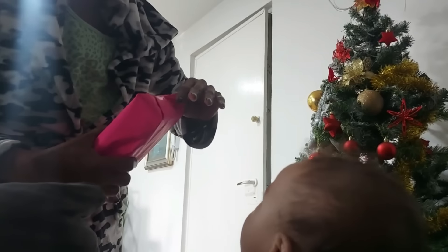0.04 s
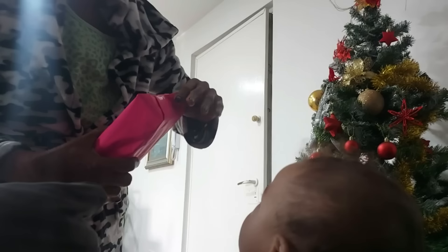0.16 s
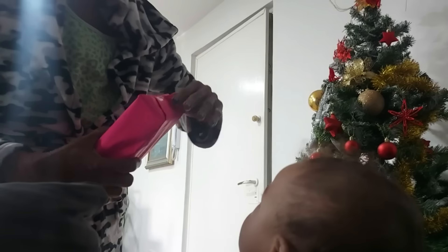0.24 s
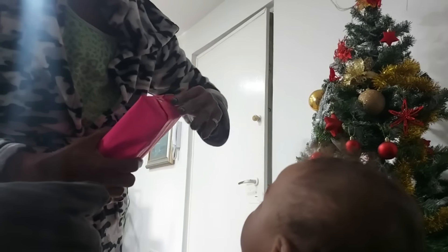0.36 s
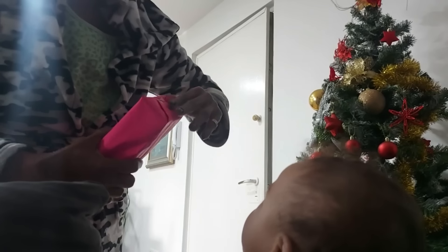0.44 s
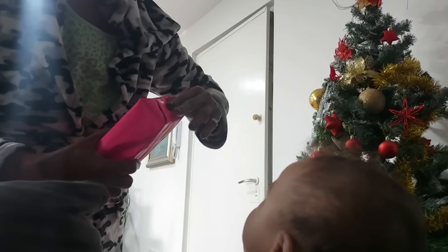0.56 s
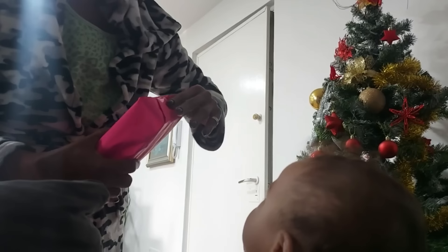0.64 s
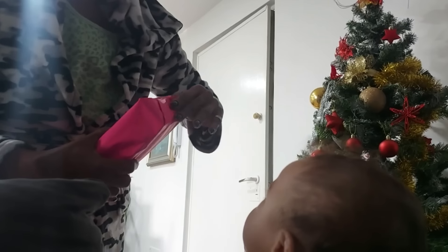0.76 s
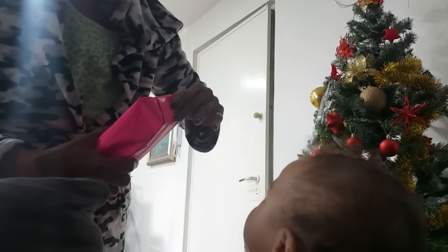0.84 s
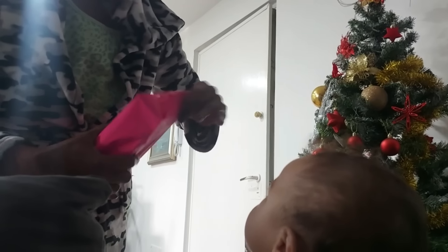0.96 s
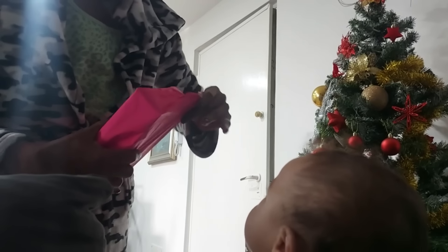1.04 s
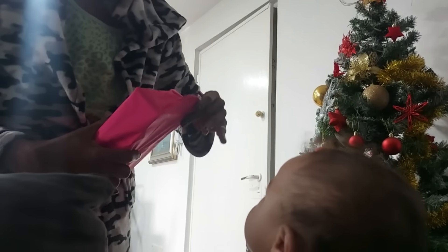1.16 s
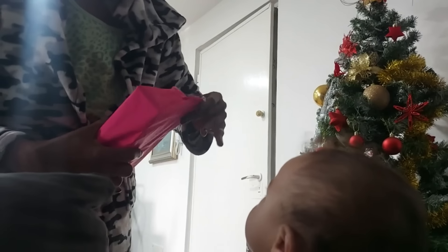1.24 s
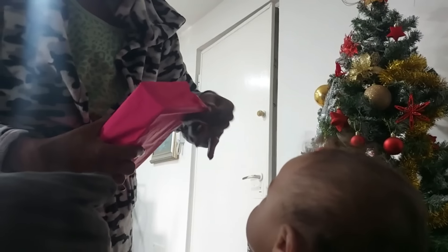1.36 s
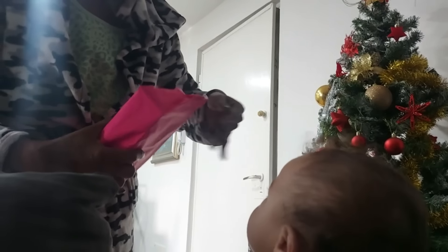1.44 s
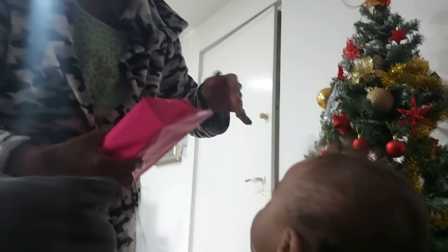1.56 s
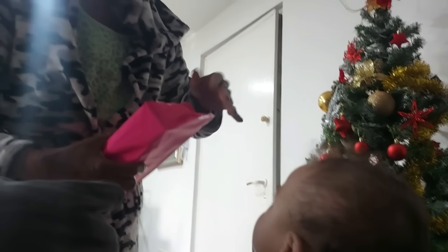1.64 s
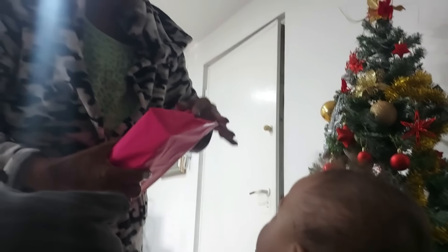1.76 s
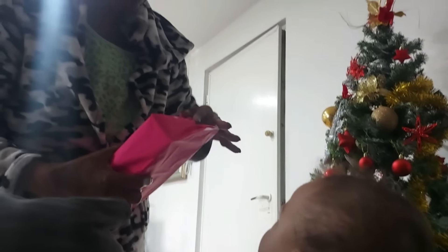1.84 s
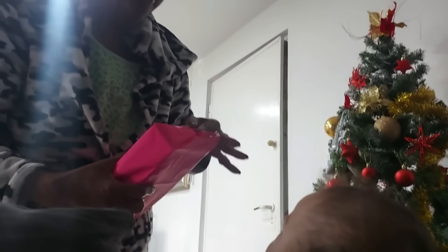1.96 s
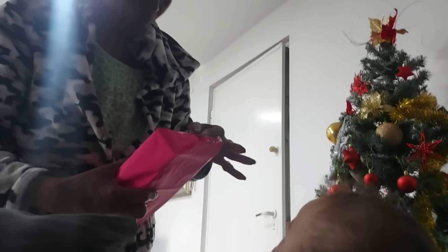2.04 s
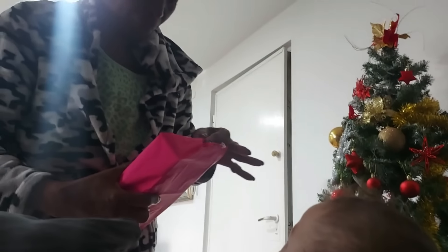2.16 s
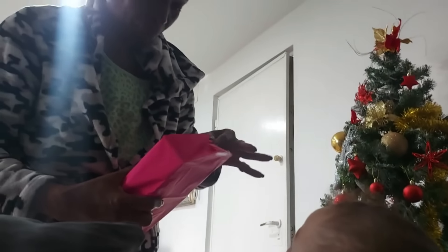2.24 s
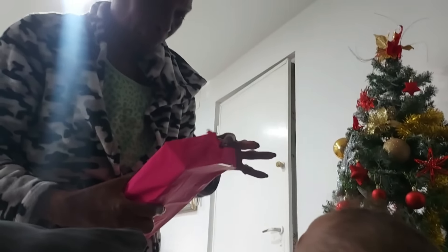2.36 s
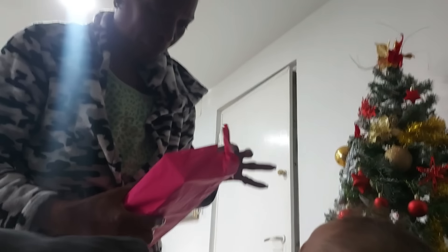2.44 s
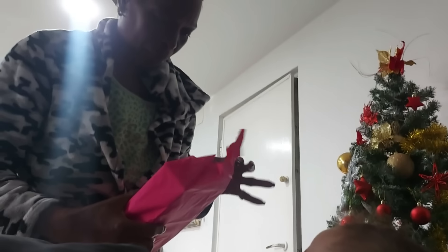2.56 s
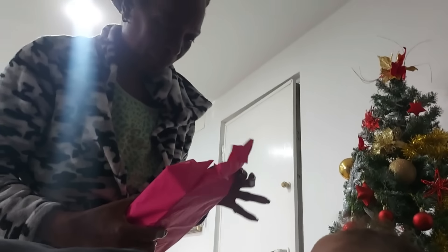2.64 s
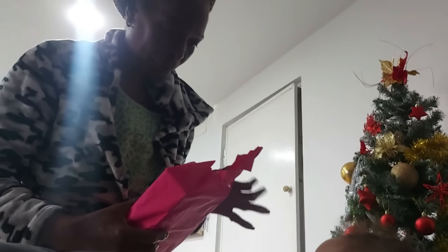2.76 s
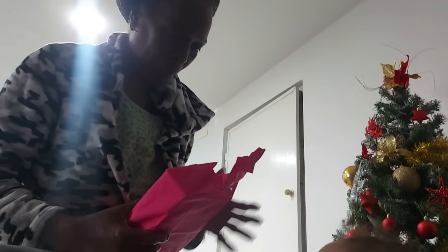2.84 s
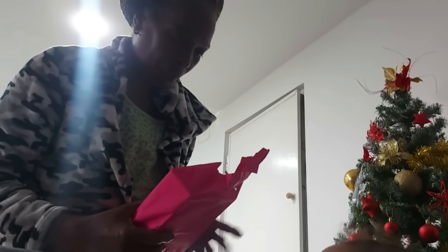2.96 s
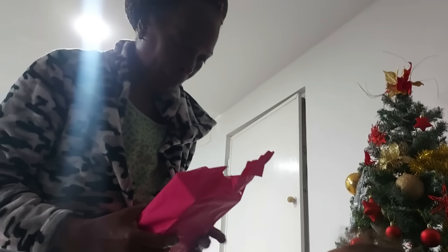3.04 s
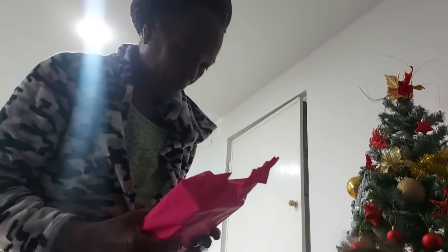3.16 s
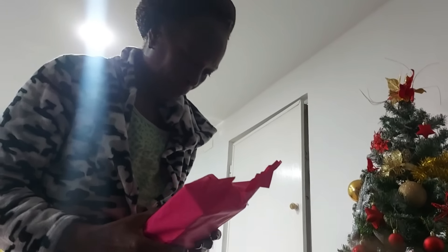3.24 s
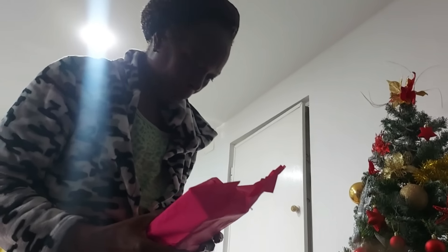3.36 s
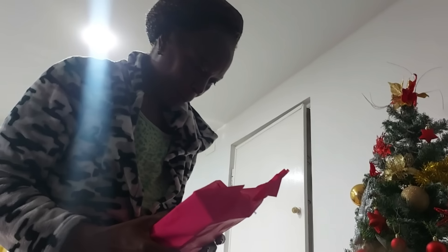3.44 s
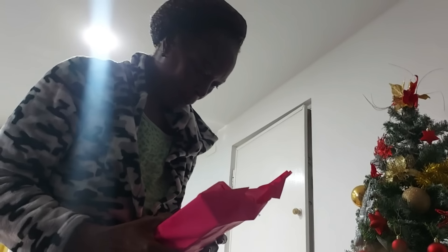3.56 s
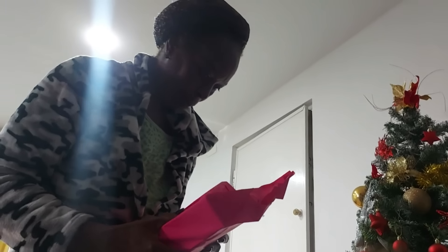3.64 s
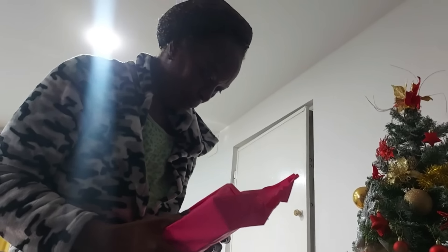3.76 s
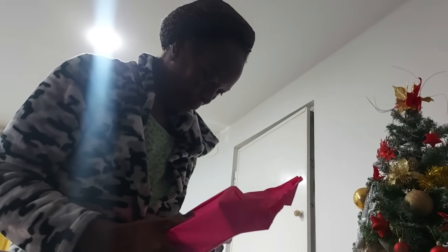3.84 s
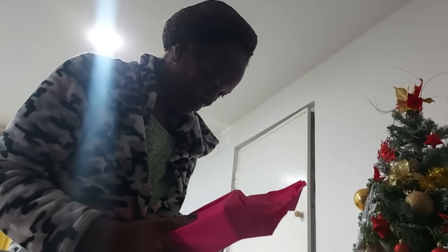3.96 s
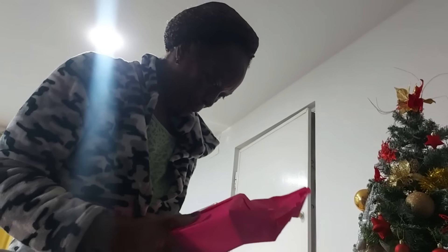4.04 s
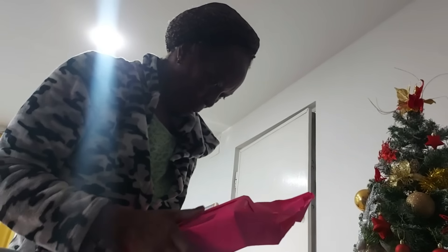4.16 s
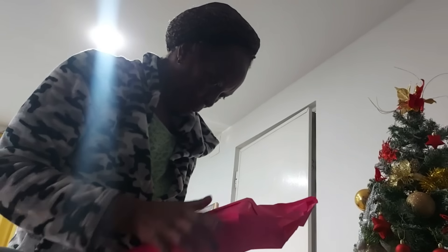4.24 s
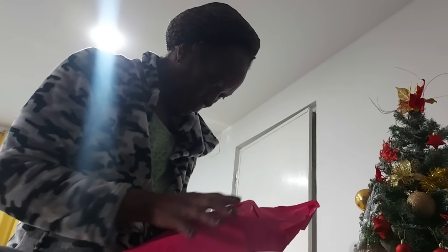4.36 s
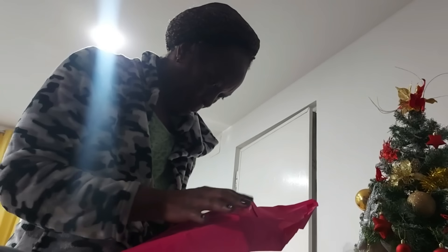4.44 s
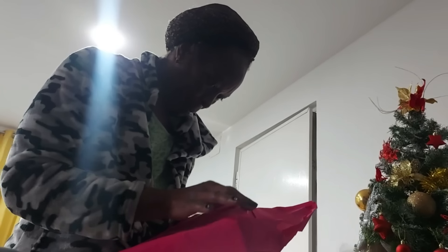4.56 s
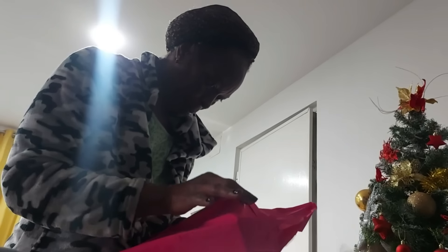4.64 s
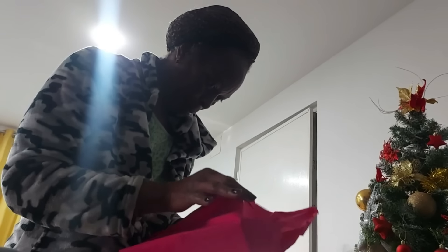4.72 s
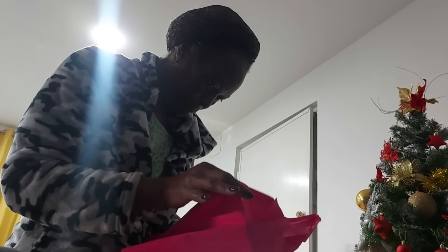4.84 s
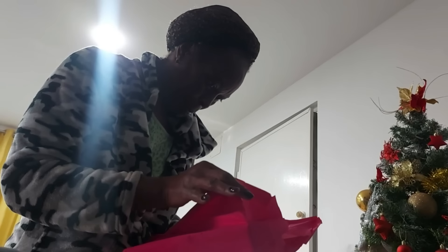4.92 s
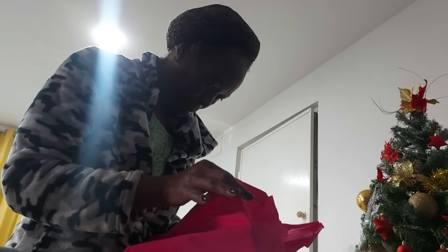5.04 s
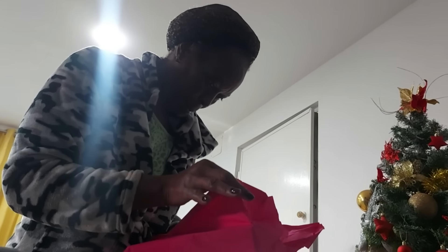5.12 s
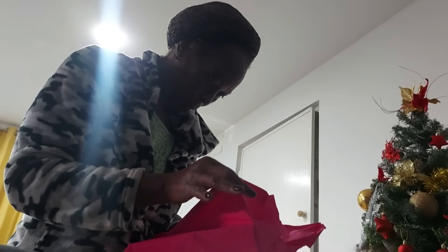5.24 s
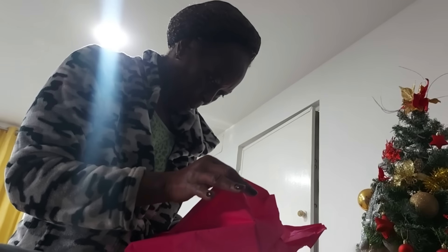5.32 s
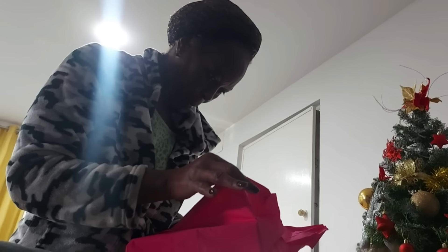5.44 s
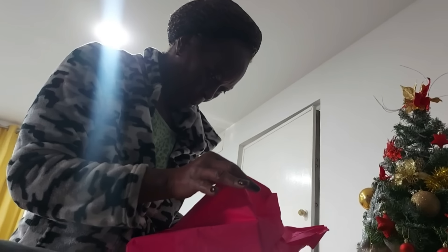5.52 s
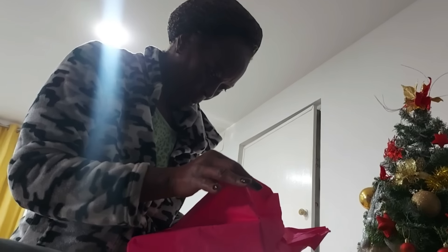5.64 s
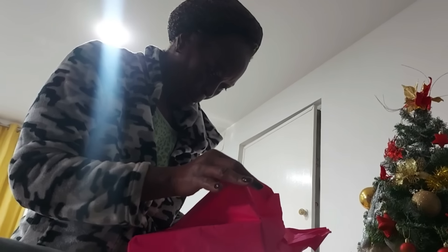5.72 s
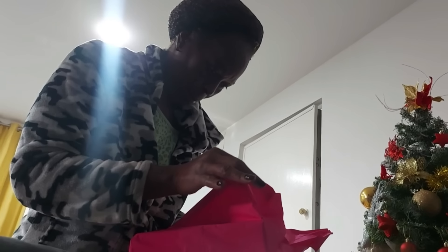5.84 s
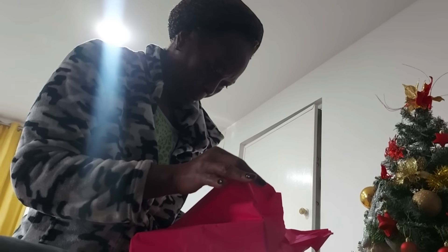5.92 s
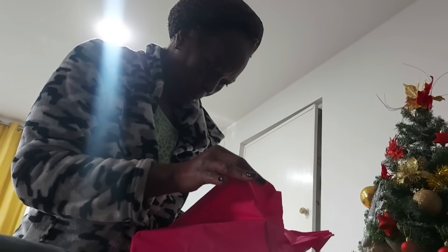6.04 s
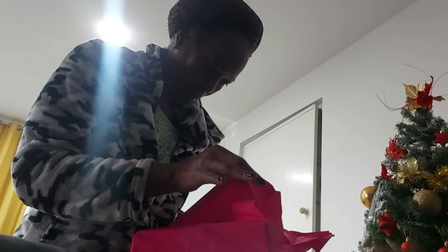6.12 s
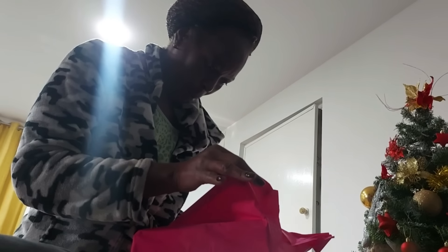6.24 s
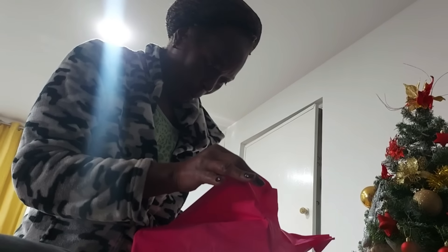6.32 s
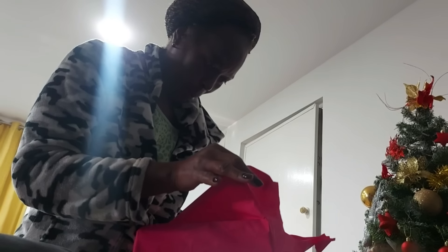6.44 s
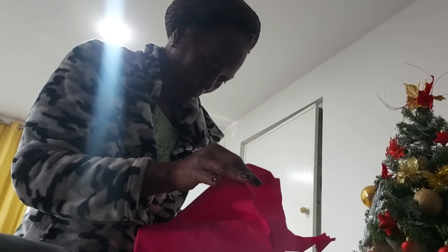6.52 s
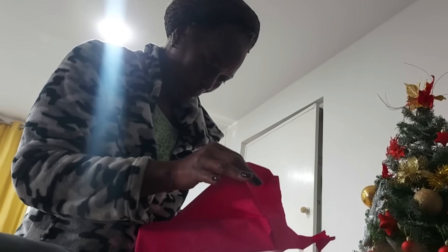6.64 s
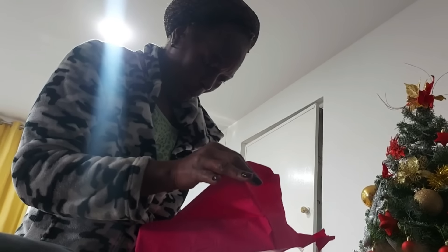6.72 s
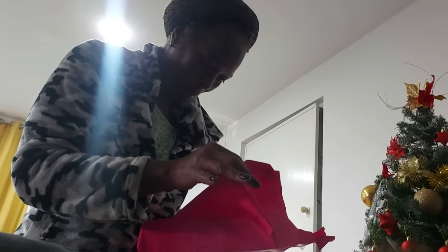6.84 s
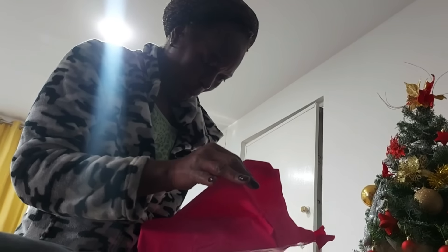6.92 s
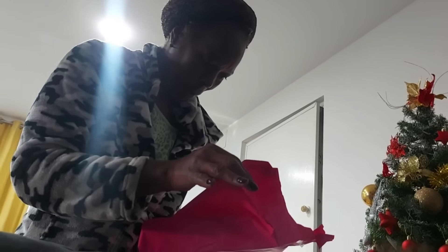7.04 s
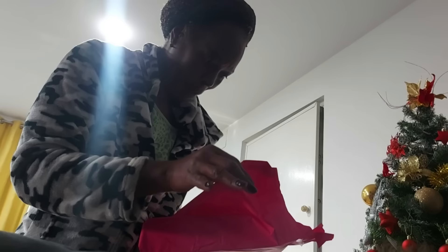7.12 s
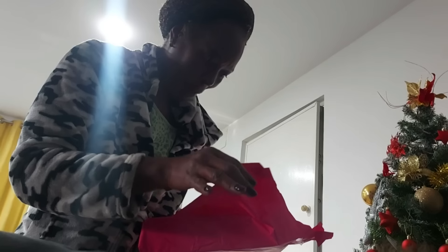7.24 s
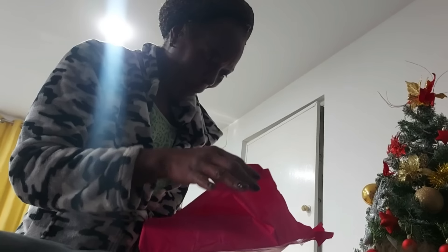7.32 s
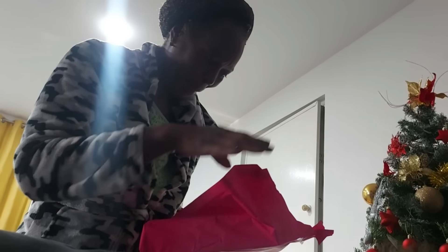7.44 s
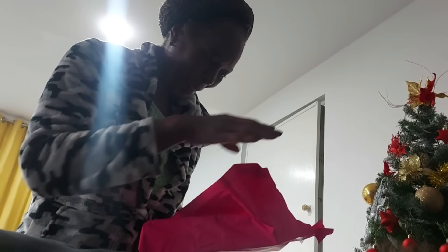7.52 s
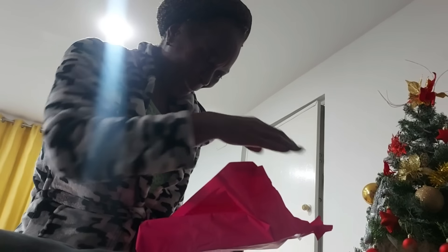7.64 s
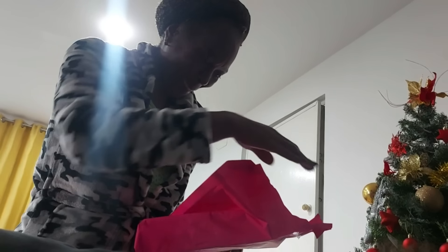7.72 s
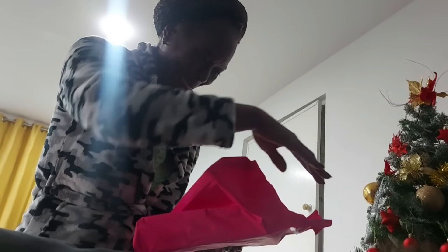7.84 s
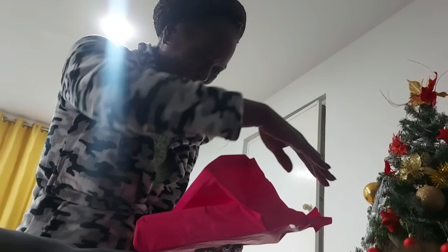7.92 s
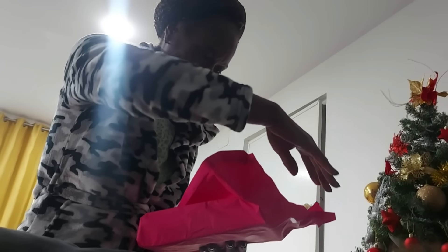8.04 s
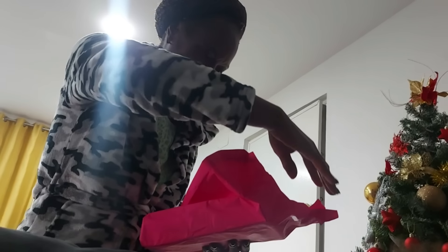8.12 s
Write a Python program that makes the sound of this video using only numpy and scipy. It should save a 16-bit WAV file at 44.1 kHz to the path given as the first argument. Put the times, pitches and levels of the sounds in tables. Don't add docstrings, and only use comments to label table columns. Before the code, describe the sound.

Stiff wrapping paper is pulled off a box by hand, about a metre from a stereo microphone in a quiet, bare room with a short bright tail and faint hiss. From 0 to 1.6 s come crisp, uneven snaps and crinkles, with the sharpest crack at about 1.0 s. A near lull follows until 2.1 s. Then crackling swells into the fullest tearing burst at 2.4-2.8 s, with low box thumps. From 3.1 to 4.0 s looser, medium crinkles scatter and thin out. At 4.6-4.8 s a short dry hand rub and rustle are heard, then sparse faint ticks until 6.2 s. Duller, larger-sheet creases cluster at 6.2-6.6 s and again near 6.9 s, with soft knocks to 7.0 s. Light rubs pass around 7.3 s, and a padded bump at 7.9 s ends it almost quiet.

```python
import sys
import numpy as np
from scipy import signal
from scipy.io import wavfile
from scipy.ndimage import uniform_filter1d

SR = 44100
rng = np.random.default_rng(int(sys.argv[2]) if len(sys.argv) > 2 else 0)


def level_to_linear(level):
    exponent = np.asarray(level, float) / 20
    return 10 ** exponent


def dump(signal):
    limited = np.clip(np.atleast_2d(signal).T, -1, 1)
    pcm = np.round(limited * 32767).astype(np.int16)
    wavfile.write(sys.argv[1], SR, pcm)


N = 360826

# pitch_hz, density_db per Hz
FLOOR_SPECTRUM = [(25, -29.5), (50, -11), (108, -8), (200, -23.5), (350, -14), (600, -27), (1500, -24),
                  (4000, -33), (8000, -26), (12500, -23.5), (16000, -30.5)]
# pitch_hz, likeness_0_to_1
PORT_LIKENESS = [(60, 1), (300, 1), (640, 0.79), (1400, 0.021), (15000, .01)]
# pitch_hz, t60_s
ROOM_T60 = [(200, 0.21), (800, .45), (2500, 0.31), (6000, 0.32), (14000, 0.67)]
# pitch_hz, level_db
ROOM_COLOUR = [(300, 7), (800, 10), (2500, 10), (6000, 8), (12000, 3), (16000, -16)]
# pitch_hz, width_hz, level_db
PORT_RESONANCES = [(500, 152.4, -2.5), (802, 85, 5.5), (2500, 880, 2), (2700, 100, 2), (4290, 300, 2),
                   (9460, 1000, -5.5), (11090, 2700, 4.5)]
# pitch_hz, width_hz, level_db
ROOM_MODES = [(53.4, 25, -6), (109, 26, -0.5), (157, 36, -3), (301, 113, 0.5), (405, 92, -4.5)]
# time_s, peak_db, falloff_db per octave around 150 Hz
KNOCKS = [
    (1.013, -32, -3),
    (2.677, -28.5, 4),
    (6.505, -35.5, 0),
    (6.89, -30, 1),
    (7.025, -29, 5),
    (7.866, -43, 5),
    (7.893, -38, -0.5),
    (7.909, -30.5, 6),
    (7.916, -28.5, 3.5),
    (8.002, -45, 2.5),
]
# peak_s, rise_s per 20 dB, fall_s per 20 dB, thump_db
SHOVES = [(.339, 1, 1, -58.5), (.526, .13, .08, -59), (.808, 0.2, .19, -47.5), (1.037, -0.36, 0.5, -44.5),
          (1.46, 0.4, 0.04, -46), (2.432, 0.2, 0.5, -35.5), (2.691, 0.2, 0.07, -30), (3.2, .5, -2, -50),
          (3.6, 1.7, 0.63, -47), (4.648, 0.1, 0.5, -55), (4.8, 0.27, 0.6, -49.5), (5.1, .6, .5, -54.5),
          (6.03, -1.23, 0, -56.5), (6.225, 0.2, -2.5, -61), (6.311, -1.5, .8, -55),
          (6.497, 0.1, -0.04, -41), (6.79, -0.7, 0, -48), (7.051, 0.3, 0.11, -46), (7.336, -1.5, .5, -60.5),
          (7.93, 0.24, 0.3, -50)]
# peak_s, rise_s per 20 dB, fall_s per 20 dB, crackle_db
PULLS = [(0, .01, -0.07, -35), (.35, .1, 0.0644, -33.5), (.526, -0.44, 0.48, -46.5), (.661, 0, .5, -41),
         (.808, 0.3, -0.24, -43.5), (1.09, 0.1, 0.38, -36.5), (1.484, 2.2, 0.16, -48),
         (1.819, 0.2, 0.68, -60), (2.148, 0.57, .5, -54.5), (2.285, -0.087, 0.28, -36.5),
         (2.432, 0.2929, 0.29, -30.5), (2.691, 0.07, 0.1, -25.5), (2.82, .1, 0.4, -54),
         (3.163, 0.04, 1.5, -51), (3.62, 0.62, 0.2, -44), (3.761, 0.18, 0.4847, -40.5),
         (4.234, .5, 0.1, -57), (4.648, 0.06, 0.26, -43), (4.787, 0.15, 0.23, -41), (5.05, 1, 0.35, -54.5),
         (5.806, 0, 0.33, -59), (6.051, -0.04, 0.3, -62.5), (6.225, 0.04, 0.14, -52.5),
         (6.311, 0.07, 1.12, -50), (6.497, 0.1165, 0.03, -41), (6.775, 0.16, 0.39, -51.5),
         (6.904, 0.08, 0.1338, -36.5), (7.05, 0, 0.82, -58.5), (7.336, 0.1, 0.32, -56.5),
         (8.18, -0.14, 0.2, -64)]
# time_s, away_db (turned into the room), bright_db (taut sheet)
SHEET_FACING = [(0, -9, 4.5), (.5, -6.5, -6.5), (.75, -7.5, 5.5), (1.05, -9.5, -3), (1.45, -6.5, -4),
                (2.2, -8.5, -1.5), (2.65, -7.5, 5), (2.9, -8.5, -11), (3.2, -3.5, -4), (3.7, -10, -6.5),
                (4.301, -6.5, 1.5), (4.75, -9, 2), (5.1, -7.5, -12), (5.8, -11, 2), (6.2, -13.5, -6.5),
                (6.65, -16, -3), (6.95, -12.5, -9.5), (7.3, -6.5, 6), (7.699, -8, 12.5)]
# start_s, end_s, level_db, lowest_pitch_hz
SLIDES = [
    (1.447, 1.487, -43, 1500),
    (4.57, 4.634, -48, 3530),
    (4.643, 4.795, -41.5, 3020),
    (7.218, 7.255, -57.5, 3800),
    (7.314, 7.364, -50.5, 3520),
    (8.04, 8.091, -62.5, 3490),
]
# time_s, peak_db, ring_hz, edge_db over 8 kHz
FLAP_SNAPS = [(.0027, -18, 5150, -15), (0.049, -14.5, 4580, -33), (.2177, -30.5, 4340, -15.5),
              (0.2483, -20, 4800, -5), (0.266, -25.5, 7200, -2.5), (0.308, -24.5, 4480, -1),
              (0.3189, -16, 4200, -7.5), (.507, -30.5, 4700, 9), (.5933, -36.5, 7330, 1),
              (0.6517, -20, 8200, 3), (0.698, -28.5, 7630, -12.5), (0.73, -25, 4540, 0),
              (0.7357, -23.5, 3900, 3.5), (.745, -22.5, 7110, -9), (0.7895, -12, 5250, -5),
              (.8051, -25.5, 7100, -8), (0.8991, -28, 6800, 6), (0.9874, -39.5, 2690, -2),
              (1.0143, 0, 3600, -3), (1.145, -28.5, 7320, -10), (1.2621, -25, 4000, 2),
              (1.3104, -29, 6400, 7.5), (1.3401, -23.5, 3000, -3), (1.3505, -18, 5870, -10),
              (1.3745, -34, 7620, 8), (1.4382, -19.5, 5150, -7.5), (1.469, -29.5, 3170, 2),
              (1.4956, -33, 3180, 3.5), (1.588, -34.5, 4300, -30)]
# time_s, peak_db, ring_hz, edge_db
TEAR_SNAPS = [(1.803, -43, 2450, 6.5), (2.047, -38, 5000, -10), (2.1382, -26, 4930, 3),
              (2.1976, -24, 3350, -9), (2.2078, -27.5, 2707, 7), (2.2404, -22.5, 3250, -12.5),
              (2.3109, -19, 3520, -10.5), (2.352, -18, 2123, -14), (2.4179, -13, 3320, -23.5),
              (2.426, -2, 2660, -17), (2.448, -21, 2670, -2), (2.4637, -5.5, 5600, -14.5),
              (2.4732, -16.5, 2500, -2.5), (2.5216, -16.5, 2700, -11), (2.5428, -22.5, 2120, -12),
              (2.6176, -14.5, 4340, -15), (2.6507, -10.5, 7150, -14), (2.6586, -15, 2280, 1),
              (2.6784, -11, 3000, -2), (2.6851, -15.5, 4000, 0), (2.7805, -14.5, 4000, -24),
              (2.7964, -18.5, 4220, -1), (2.833, -22, 2580, -10)]
# time_s, peak_db, ring_hz, edge_db
TURN_SNAPS = [(3.0793, -28.5, 7500, 3.5), (3.149, -30, 4330, -17), (3.162, -26.5, 7100, -0.5),
              (3.2421, -26, 5600, -17), (3.254, -30, 7700, 2), (3.2689, -21, 4280, -8.5),
              (3.3912, -20.5, 4800, -6), (3.4906, -19, 3100, -15), (3.5372, -19.5, 4660, -7.5),
              (3.5994, -19.5, 4550, -11), (3.622, -17, 5300, -1), (3.6608, -26.5, 1950, -14),
              (3.7275, -26.5, 4600, 5), (3.749, -17.5, 6230, -15), (3.7631, -21, 4530, 5),
              (3.84, -32, 5300, -15), (3.9044, -26.5, 6900, -12), (3.989, -34, 4330, -21),
              (4.036, -32.5, 4700, -4), (4.213, -33.5, 4730, -5), (4.2365, -30.5, 5630, -27),
              (4.2554, -37, 7440, -9.5), (4.3748, -35, 7360, -19), (4.4487, -40, 6770, -2)]
# time_s, peak_db, ring_hz, edge_db
SEAM_SNAPS = [(4.6402, -23, 6600, -5), (4.6505, -30, 7700, -17), (4.7568, -32, 4330, -6),
              (4.7667, -26.5, 4100, -16), (4.7819, -24.5, 7300, 1.5), (4.7948, -17.5, 2590, -9),
              (4.9529, -29, 1800, -13), (5.059, -42.5, 5070, 0), (5.1447, -35, 4190, -17),
              (5.199, -39.5, 3500, -9.5), (5.765, -43.5, 2800, -13.5), (5.7936, -28, 4080, -18),
              (6.04, -44.5, 4100, -6.5)]
# time_s, peak_db, ring_hz, edge_db
OPEN_SHEET_SNAPS = [(6.2218, -33, 7240, -3), (6.2873, -33.5, 4400, -21), (6.2998, -18, 4260, -8),
                    (6.3362, -31, 4160, -18), (6.4364, -31.5, 2880, -21), (6.477, -19, 3520, -35),
                    (6.488, -18.5, 3730, -11), (6.4979, -20.5, 2700, -30), (6.545, -26, 3370, -14),
                    (6.5619, -24.5, 3970, -14), (6.603, -16, 4120, -14), (6.7071, -39, 3750, -13),
                    (6.7375, -34, 1490, -18.5), (6.7538, -33.5, 2180, -15), (6.786, -32.5, 3680, -13),
                    (6.7982, -32, 4100, -14), (6.817, -32.5, 2800, -13), (6.8453, -38, 2890, -18),
                    (6.868, -18.5, 2530, -28), (6.89, -19, 4080, -20), (6.896, -17.5, 4500, -4),
                    (6.9119, -28, 4000, -22), (7.0293, -24.5, 1470, -16), (7.055, -26.5, 4560, -18),
                    (7.099, -34, 3570, -13), (7.167, -40.5, 2570, -12), (7.3886, -41, 3430, -23),
                    (7.658, -46.5, 2560, -8.5)]

BURST = 400


def at_hz(points, hz):
    table = np.array(points)
    return np.interp(np.log(hz), np.log(table[:, 0]), table[:, 1])


def rms_one(x):
    return x / np.sqrt(np.mean(x ** 2) + 1e-20)


def energy_one(x):
    return x / np.sqrt(np.sum(x ** 2) / 2)


def band(x, low_hz, high_hz):
    edges_hz = [low_hz, min(high_hz, .45 * SR)]
    return signal.sosfilt(signal.butter(2, edges_hz, "band", fs=SR, output="sos"), x)


def resonance(x, hz, width_hz):
    r = np.exp(-np.pi * width_hz / SR)
    poles = [1, -2 * r * np.cos(2 * np.pi * hz / SR), r * r]
    return signal.lfilter([(1 - r * r) / 2, 0, (r * r - 1) / 2], poles, x)


def drift(rate):
    r = np.exp(-80 * np.pi * rate / SR)
    slow = signal.lfilter([1], [1, -2 * r, r * r], rng.standard_normal(N // 40 + 2002))
    slow = rms_one(slow[2000:])
    return np.interp(np.arange(N) / 40, np.arange(len(slow)), slow)


def two_ports(white, hz):
    alike = np.clip(at_hz(PORT_LIKENESS, hz), 0, 1)
    return np.sqrt(alike) * white[0] + np.sqrt(1 - alike) * white[1:]


def efforts(rows, rest_db):
    peak_s, rise_s, fall_s, db = np.transpose(rows)[..., None]
    t = np.arange(0, N + 64, 64) / SR
    since = t - peak_s
    level_db = db - 20 * np.maximum(-since / np.abs(rise_s), since / np.abs(fall_s))
    strongest_db = np.maximum(level_db.max(axis=0), rest_db)
    return np.interp(np.arange(N) / SR, t, strongest_db)


def room_floor():
    out, edges = 0, 30 * 2 ** np.arange(0, 9.6, .5)
    white = rng.standard_normal((2, 2, N))
    for k, (low, high) in enumerate(zip(edges, edges[1:])):
        mid, side = band(white[k % 2], low, high)
        hz = np.sqrt(low * high)
        alike = np.clip(at_hz(PORT_LIKENESS, hz), 0, 1)
        ports = np.sqrt(1 + alike) * mid + np.sqrt(1 - alike) * side * [[1], [-1]]
        out = out + level_to_linear(at_hz(FLOOR_SPECTRUM, hz)) * ports
    return level_to_linear(-67.5) * rms_one(out)


def room_tail(x, gap_s=.004):
    t = np.arange(SR // 2) / SR
    tail, edges = 0, 200 * 2 ** np.arange(0, 7, .5)
    for low, high in zip(edges, edges[1:]):
        hz = np.sqrt(low * high)
        noise = band(two_ports(rng.standard_normal((3, len(t))), hz), low, high)
        tail = tail + noise * level_to_linear(at_hz(ROOM_COLOUR, hz) - 60 * t / at_hz(ROOM_T60, hz))
    tail *= np.clip(t / gap_s - 1, 0, 1)
    return signal.oaconvolve(x, energy_one(tail), axes=1)[:, :N]


def port_cavities(x):
    for hz, width_hz, db in PORT_RESONANCES:
        x = x + (level_to_linear(db) - 1) * resonance(x, hz, width_hz)
    return x


def thumps(level_db):
    shared, left, right = rng.standard_normal((3, N)) * level_to_linear(2.8 * drift(22))
    push = shared + 0.59 * np.array([left, right])
    time_s, knock_db, falloff_db = np.transpose(KNOCKS)
    out = band(push, 390, 1100) * level_to_linear(level_db - 2.5)
    for k, (hz, width_hz, mode_db) in enumerate(ROOM_MODES):
        knocks = np.zeros(N)
        octaves = np.abs(np.log2(hz / 150))
        knocks[(time_s * SR).astype(int)] = -level_to_linear(knock_db + 38.5 - falloff_db * octaves)
        knocks = band(knocks, 34, 700) * level_to_linear(np.array([[.6], [-.6]]))
        small_db = 0.33 * (level_db + 59.5) * np.log2(hz / 335)
        drive = level_to_linear(level_db + 15.5 + small_db) * push + knocks
        sign = (-1) ** k
        out = out + sign * level_to_linear(mode_db) * resonance(drive, hz, width_hz) * np.sqrt(50 / width_hz)
    return out


def slides():
    t, out = np.arange(N) / SR, np.zeros((2, N))
    shared, left, right = rng.standard_normal((3, N)) * level_to_linear(3.8 * drift(46))
    rub = shared + np.array([left, right])
    for start_s, end_s, db, low_hz in SLIDES:
        near = slice(round((start_s - .02) * SR), round((end_s + .02) * SR))
        inside_s = np.minimum(t[near] - start_s, end_s - t[near])
        stroke = np.clip(inside_s / 0.031 + .5, 0, 1)
        out[:, near] += level_to_linear(db) * stroke * rms_one(band(rub[:, near], low_hz, 11600))
    return out


def buckle(noise):
    return noise * np.exp(-np.arange(BURST) / SR / .0018)


def three_parts(burst, hz, alike, sharp):
    alike = np.clip(alike, 0, 1)
    ports = np.sqrt(alike) * burst[0] + np.sqrt(1 - alike) * burst[1:]
    tone = resonance(ports, hz, .12 * hz) - 0.37 * resonance(ports, .64 * hz, 0.097 * hz)
    rustle = band(ports, 0.44 * hz, 8500)
    ring = sharp * energy_one(tone) + energy_one(rustle)
    body = band(burst[0] + 0.083 * burst[1:], 380, 1700)
    edge = band(ports, 7200, 17500)
    return [energy_one(part) for part in (ring, body, edge)]


def crackle(level_db, bright_db):
    busy_db = .2 * (level_db + 47) + 4 * drift(12)
    sizes = level_to_linear(4.5 * np.minimum(rng.exponential(1, N), 2.2)) * rng.choice([-1, 1], N)
    clicks = sizes * (rng.random(N) < 1200 * level_to_linear(busy_db) / SR)
    clicks *= level_to_linear(4.5 * drift(30) - busy_db / 2)
    facets_hz, dealt = np.geomspace(1700, 7500, 12), rng.integers(0, 12, N)
    layers = np.zeros((3, 2, N))
    for k, hz in enumerate(facets_hz):
        burst = buckle(rng.standard_normal((3, BURST)))
        parts = np.array(three_parts(burst, hz, alike=0.13, sharp=0.52))
        facet_clicks = clicks * (dealt == k)
        layers += signal.oaconvolve(facet_clicks[None, None], parts, axes=2)[..., :N]
    ring_db, body_db = level_db - 0.5, level_db - 12 - 0.43 * bright_db
    edge_db = level_db + bright_db - 5.5
    out = 0
    for db, layer in zip((ring_db, body_db, edge_db), layers):
        usual_rms = np.sqrt(np.median(uniform_filter1d(layer ** 2, size=4000)))
        out = out + level_to_linear(db) * layer / usual_rms
    return out


def snaps(pull_db):
    creases = FLAP_SNAPS + TEAR_SNAPS + TURN_SNAPS + SEAM_SNAPS + OPEN_SHEET_SNAPS
    out = np.zeros((2, 2, N + BURST))
    noise = rng.standard_normal((len(creases), 3, BURST + 1))
    for (time_s, db, hz, edge_db), draw in zip(creases, noise):
        burst = buckle(draw[:, 1:])
        at = round(time_s * SR) - 10
        pull_excess_db = pull_db[at + 900] - db + 22
        body_db = -15.5 + .2 * pull_excess_db + 2.5 * draw[0, 0]
        for path, sharp in zip(out, (1.1, .3)):
            ring, body, edge = three_parts(burst, hz, alike=0.29, sharp=sharp)
            snap = ring + level_to_linear(body_db) * body + level_to_linear(edge_db + 1.27) * edge
            path[:, at:at + BURST] += level_to_linear(db + 14.5) * snap
    return out[..., :N]


def scene():
    time_s, *columns = np.transpose(SHEET_FACING)
    away_db, bright_db = [np.interp(np.arange(N) / SR, time_s, c) for c in columns]
    pull_db = efforts(PULLS, rest_db=-77)
    direct, all_round = snaps(pull_db) + crackle(pull_db, bright_db) + slides()
    lead = 6
    direct[1] = np.r_[np.zeros(lead), direct[1, :-lead]]
    low = thumps(efforts(SHOVES, rest_db=-66.5))
    tail = room_tail(all_round * level_to_linear(away_db) + level_to_linear(-7.0) * low)
    paper = direct * level_to_linear(np.array([[-.6], [.6]])) + tail
    return port_cavities(paper) + low + room_floor()


def top_cut(x):
    return signal.sosfilt(signal.butter(12, 21590, fs=SR, output="sos"), x)


def record(dry):
    cut = signal.sosfilt(signal.cheby2(10, 50, 16300, fs=SR, output="sos"), dry)
    return top_cut(np.clip(cut, -1, 1))


dry = scene()
out = record(dry)
dump(out)
```